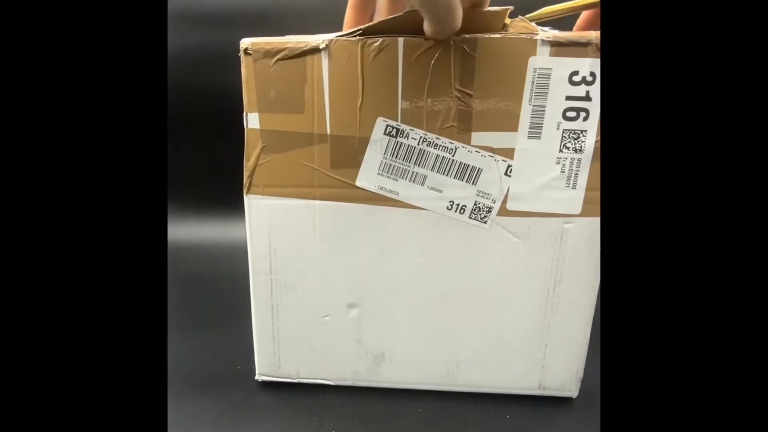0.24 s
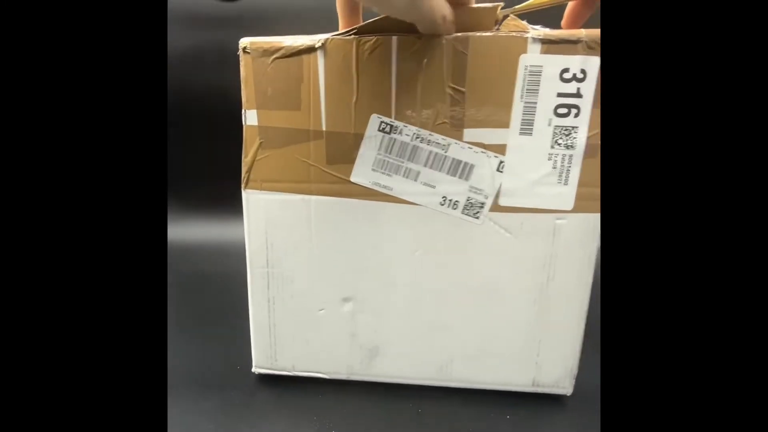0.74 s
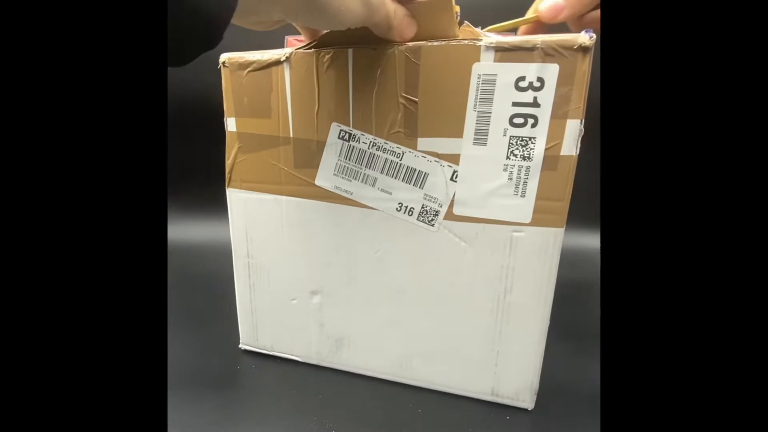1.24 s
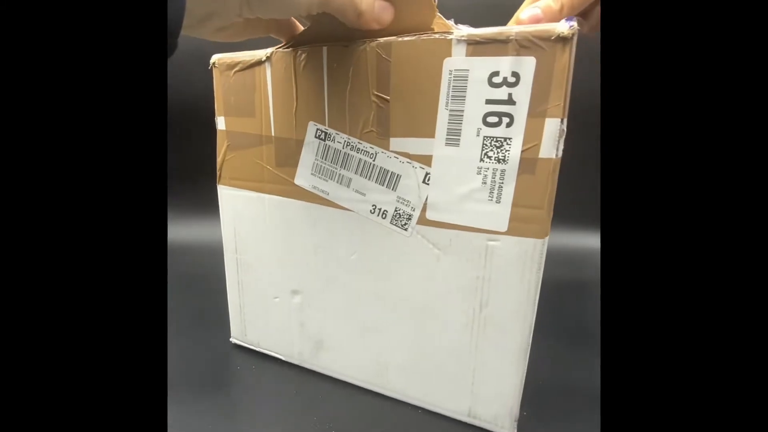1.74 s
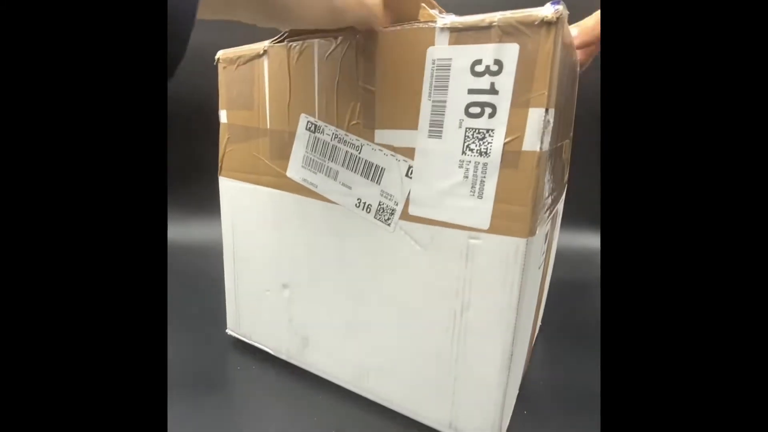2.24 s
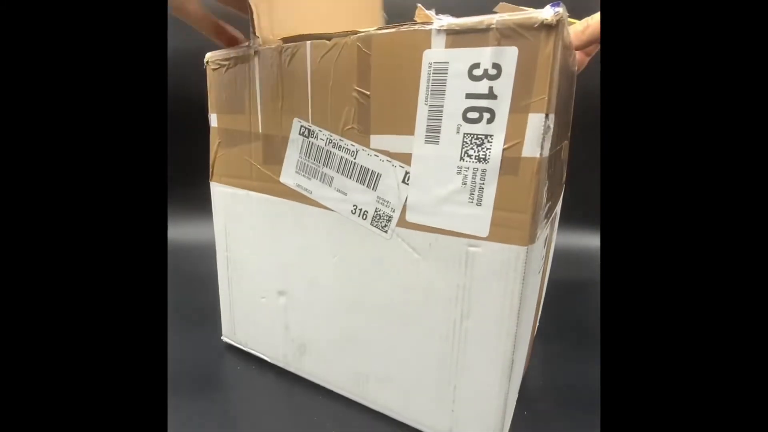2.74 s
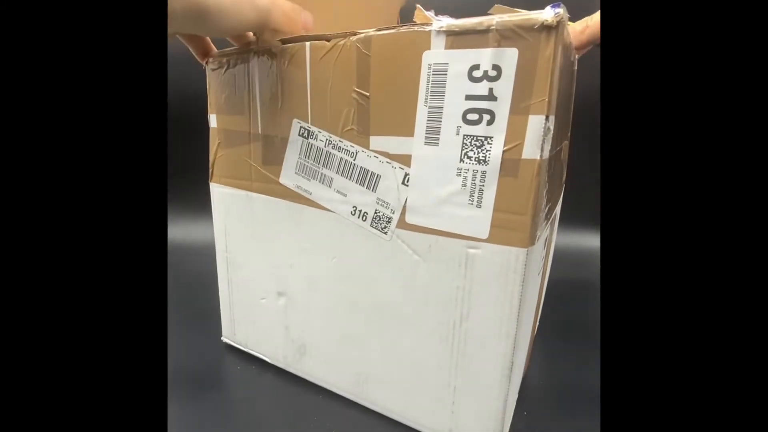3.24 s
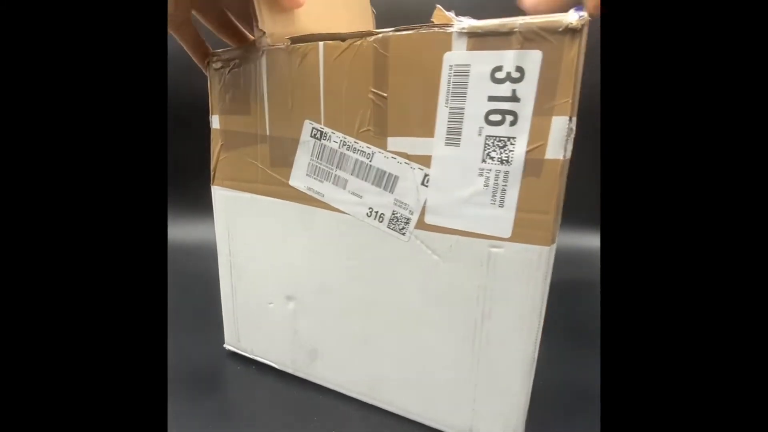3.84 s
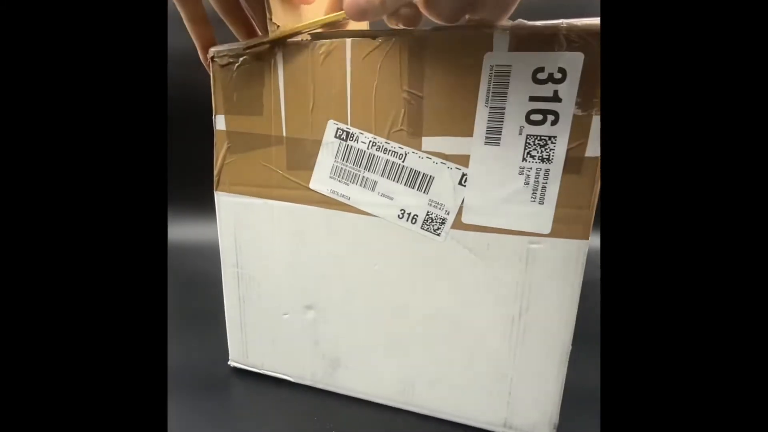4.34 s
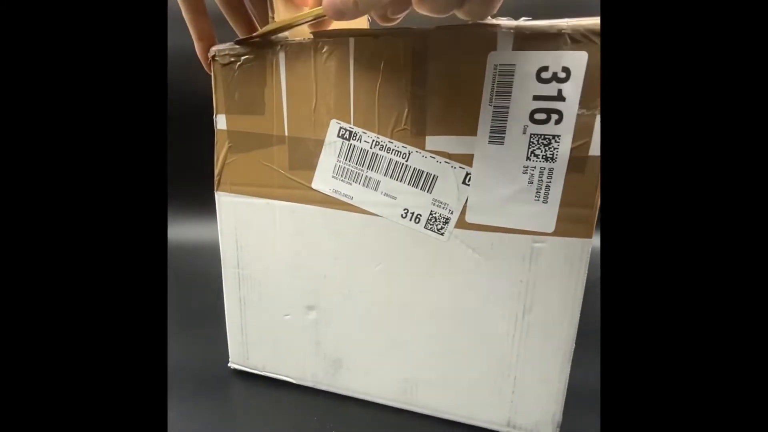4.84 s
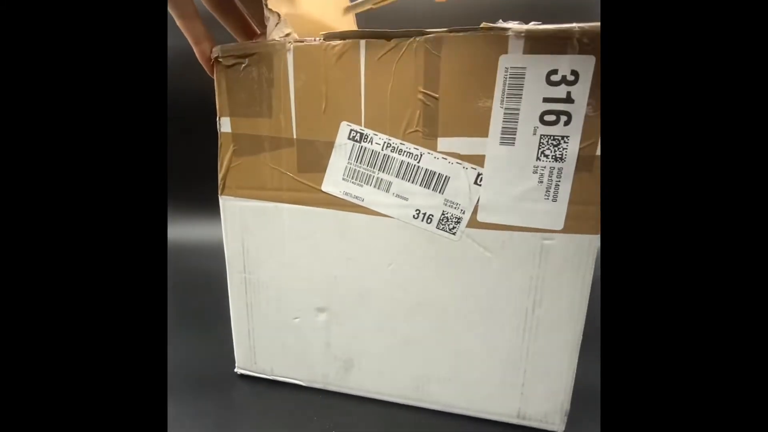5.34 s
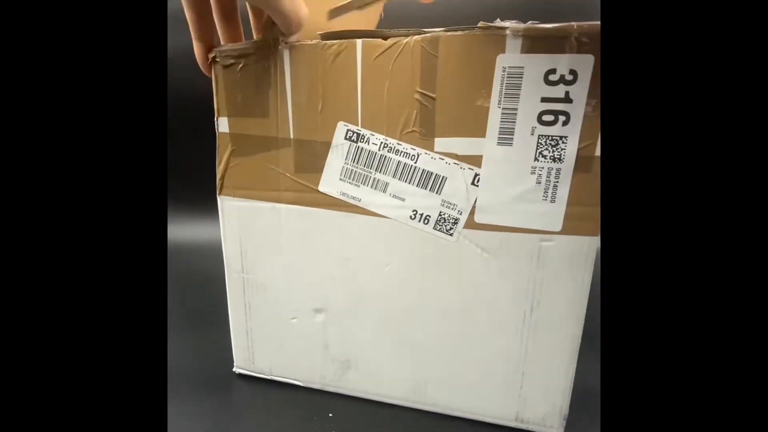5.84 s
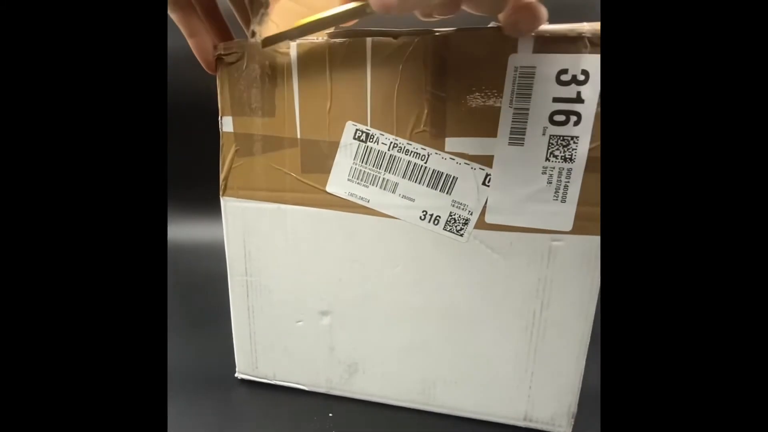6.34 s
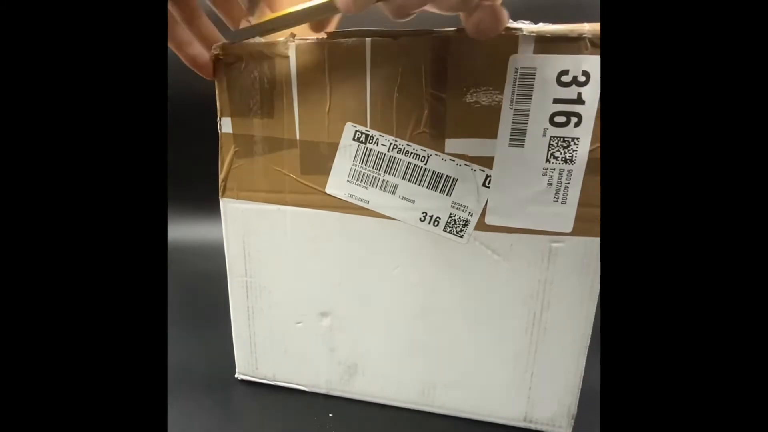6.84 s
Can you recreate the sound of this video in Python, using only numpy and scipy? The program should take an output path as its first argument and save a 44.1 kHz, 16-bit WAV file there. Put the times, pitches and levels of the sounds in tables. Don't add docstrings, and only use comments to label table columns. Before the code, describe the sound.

Close, dry handling of a taped carton: rustling and rubbing, sharp tape snaps, crackling tears and dull hollow knocks, with brief lulls.

```python
import sys
import numpy as np
from scipy import signal
from scipy.fft import rfft, irfft, next_fast_len
from scipy.io import wavfile

SR = 44100
rng = np.random.default_rng(int(sys.argv[2]) if len(sys.argv) > 2 else 0)


def undo_db(level):
    steps = np.asarray(level, float) / 20
    return 10 ** steps


def pcm_store(signal):
    levels = np.round(np.clip(np.atleast_2d(signal), -1, 1) * 32767)
    wavfile.write(sys.argv[1], SR, levels.astype(np.int16).T)


N = 312669
PADDED = next_fast_len(N + 8192)
HZ = np.maximum(np.arange(PADDED // 2 + 1) * SR / PADDED, 1)


def rms_one(x):
    return x / np.sqrt(np.mean(x ** 2) + 1e-20)


def in_time(rows):
    s, *columns = np.transpose(rows)
    return [np.interp(np.arange(N) / SR, s, column) for column in columns]


def at_hz(points):
    hz, values = np.array(points)[:, :2].T
    return np.interp(np.log(HZ), np.log(hz), values)


def colour(x, points, low_hz=1, high_hz=30000):
    edges = (1 + (low_hz / HZ) ** 6) * (1 + (HZ / high_hz) ** 6)
    gain = undo_db(at_hz(points)) / np.sqrt(edges)
    cepstrum = irfft(np.log(rms_one(gain) + 1e-5), PADDED)
    cepstrum[1:PADDED // 2] *= 2
    cepstrum[PADDED // 2 + 1:] = 0
    return irfft(rfft(x, PADDED) * np.exp(rfft(cepstrum)), PADDED)[..., :N]


def drift(rate):
    r = np.exp(-32 * np.pi * rate / SR)
    noise = rng.standard_normal(N // 16 + 2002)
    slow = signal.lfilter([1], [1, -2 * r, r * r], noise)[2000:]
    return np.interp(np.arange(N) / 16, np.arange(len(slow)), rms_one(slow))


def ring(x, hz, t60):
    r = undo_db(-60 / (t60 * SR))
    w = 2 * np.pi * hz / SR
    return signal.lfilter([0, np.sin(w)], [1, -2 * r * np.cos(w), r * r], x + 1e-18)


def fibres(spread_db, clump_db, clump_rate):
    uneven_db = spread_db * np.minimum(rng.exponential(1, N), 5)
    sizes = undo_db(uneven_db + clump_db * drift(clump_rate))
    return rng.standard_normal((2, N)) * rms_one(sizes)


# start_s, level_db
HUM_LEVEL = [
    (0.0, -49),
    (0.57, -67),
    (0.99, -50.5),
    (2.86, -43.5),
    (3.16, -51),
    (5.47, -56),
    (7.09, -57.5),
]
# pitch_hz, density_db
RUMBLE = [(20, -19), (45, -0.5), (62, 2), (80, 0.5), (100, -15), (160, -3.5)]
# pitch_hz, density_db
ROOM_TONE = [(100, 2.5), (260, 3.5), (400, -10.5), (900, -14), (1300, -23.5), (3000, -37), (6200, -33),
             (9000, -31), (16000, -55)]
ROOM_TONE_DB = -55
HUM_HZ, HUM_T60_S = 80, .45


def background():
    noise = rng.standard_normal(N)
    broad = 0.5 * colour(noise, RUMBLE, 0.64, 140)
    narrow = 0.47 * rms_one(ring(noise, HUM_HZ, HUM_T60_S))
    hum = (broad + narrow) * undo_db(in_time(HUM_LEVEL)[0])
    tone = colour(rng.standard_normal((2, N)), ROOM_TONE, 100)
    return hum * [[1], [0]] + undo_db(ROOM_TONE_DB - 5.5) * tone


# start_s, level_db
HUM_NOTE = [
    (0, -66),
    (.45, -61),
    (1.25, -60),
    (1.7, -52),
    (2.2, -75),
    (7.09, -80),
]


def hum_note():
    phase = 2 * np.pi * np.cumsum(HUM_HZ + .7 + 1.5 * drift(0.89)) / SR
    return np.sin(phase) * undo_db(in_time(HUM_NOTE)[0] + 7.0) * [[1], [0]]


# start_s, low_strip_db, high_strip_db
CREEP = [
    (0, -77, -80),
    (.2, -65, -64),
    (.45, -67, -63),
    (.56, -70, -70),
    (.62, -92, -93),
]
CREEP_HZ = [5130, 6600]


def creep():
    noise = rng.standard_normal((2, N))
    pulled = np.arange(N) < CREEP[-1][0] * SR
    strips = zip(in_time(CREEP), CREEP_HZ)
    return pulled * sum(undo_db(db) * rms_one(ring(noise, hz, 0.0099)) for db, hz in strips)


STROKE_CURVE = 1.55


def pressure(strokes):
    t = np.arange(N // 16 + 1) * 16 / SR
    out = 0
    for s, level_db, swell, fade in strokes:
        away = np.where(t < s, (s - t) / swell, (t - s) / fade)
        out = out + undo_db(level_db - 20 * away ** STROKE_CURVE)
    return np.repeat(out, 16)[:N]


# peak_s, level_db, swell_s, fade_s
RUBS = [(.045, -51.5, 0.059, 0.051), (.33, -60.5, 0.21, 0.26), (.539, -53.5, 0.069, 0.055),
        (.785, -41, 0.17, 0.1), (1.107, -51.5, 0.051, 0.063), (1.262, -47.5, 0.2, 0.052),
        (1.367, -45.5, 0.12, 0.3), (1.766, -35.5, 0.098, 0.066), (1.831, -40.5, 0.08, 0.063),
        (2.185, -45, 0.036, 0.11), (2.465, -45.5, 0.072, 0.16), (3.472, -42, 0.079, 0.033),
        (3.66, -57, 0.054, 0.19), (3.851, -47, 0.23, 0.13), (4.13, -60.5, 0.23, 0.27),
        (5.004, -31, 0.061, 0.076), (5.408, -48.5, 0.043, 0.052), (5.6, -51, 0.12, 0.088),
        (5.74, -59, 0.065, 0.76), (6.1, -45.5, 0.073, 0.045), (6.395, -60, 0.093, 0.067),
        (7.05, -49, 0.21, 0.041)]
# peak_s, level_db, swell_s, fade_s
SLIDES = [(.93, -55.5, 0.031, 0.2), (4.29, -58, 0.08, 0.24), (1.66, -39.5, 0.011, 0.15),
          (2.09, -50.5, 0.22, 0.047), (2.27, -46.5, 0.036, 0.038), (2.44, -52, 0.085, 0.071),
          (2.515, -35, 0.19, 0.0089), (2.58, -58.5, 0.063, 0.28), (2.878, -45.5, 0.2, 0.1),
          (3.008, -50.5, 0.042, 0.084), (3.293, -49, 0.053, 0.093), (3.367, -45, 0.021, 0.091),
          (3.55, -52, 0.15, 0.16), (4.207, -56.5, 0.0074, 0.11), (4.694, -55.5, 0.1, 0.15),
          (4.91, -49, 0.15, 0.091), (4.974, -39, 0.065, 0.047), (5.123, -34.5, 0.035, 0.031),
          (5.278, -44, 0.19, 0.061), (5.537, -36, 0.064, 0.023), (4.58, -68, 0.11, 0.04),
          (5.8, -53, 0.22, 0.67), (5.937, -51, 0.035, 0.088), (6.08, -32.5, 0.06, 0.028),
          (6.211, -36.5, 0.033, 0.037), (6.33, -41.5, 0.046, 0.22), (6.46, -38.5, 0.11, 0.13),
          (6.535, -45, 0.12, 0.031), (6.74, -54.5, 0.078, 0.28), (6.829, -44, 0.065, 0.15),
          (6.964, -43.5, 0.081, 0.093), (7.08, -43.5, 0.065, .1)]
# peak_s, level_db, half_length_s
SHOVES = [
    (.165, -41.5, 0.08),
    (0.593, -45.5, 0.1),
    (0.99, -47, 0.042),
    (2.093, -40.5, 0.15),
    (5.026, -37.5, 0.03),
    (6.149, -38.5, 0.06),
    (6.823, -37, 0.056),
]
# hiss_db, sheen_db, card_db, box_db
SLIDE_SHARE = (-3.5, 1.17, -14.5, -10.5)
RUB_SHARE = (-1.5, -2.5, -4.5, -1)
SHOVE_SHARE = (-26.5, -62, -19.5, -6)
REST_DB = -87
LIGHT_TOUCH_DULLS = 0.15


def rubbing():
    grains = fibres(spread_db=1.8, clump_db=1.3, clump_rate=160) * undo_db(1.2 * drift(22))
    shoves = [(s, db, half, half) for s, db, half in SHOVES]
    shares = undo_db(REST_DB) + np.outer(undo_db(SLIDE_SHARE), pressure(SLIDES))
    shares += np.outer(undo_db(RUB_SHARE), pressure(RUBS))
    shares += np.outer(undo_db(SHOVE_SHARE), pressure(shoves))
    shares[1] *= (shares[0] / undo_db(-40.5)) ** LIGHT_TOUCH_DULLS
    shares[-1] += grumble()
    return np.array([grains * share * undo_db(0.65 * drift(6.6)) for share in shares])


# start_s, peak_db, pitch_hz, t60_s
PLUCKS = [(0.5502, -40, 1220, 0.022), (.8585, -43, 3200, .04), (.32, -43, 3500, 0.09),
          (.922, -47, 6260, 0.046), (.970, -25.5, 7600, 0.091), (1.054, -41, 6200, 0.027),
          (1.101, -15, 6770, 0.1), (1.1515, -17, 3370, 0.032), (1.2052, -42, 6600, .03),
          (1.2636, -30, 5900, 0.077), (1.3454, -22.5, 2860, 0.076), (1.346, -25.5, 6310, 0.038),
          (1.417, -47, 6200, .03), (1.4387, -37, 2610, 0.071), (1.4757, -32, 2920, 0.037),
          (1.574, -39, 2960, 0.029), (1.6338, -17.5, 6330, 0.05), (1.711, -9.5, 2960, .04),
          (1.711, -16, 498, 0.025), (1.713, -16, 1497, 0.023), (1.7393, -23.5, 3650, 0.033),
          (2.4045, -4, 6200, 0.06), (2.405, -16, 1447, 0.069), (2.4336, -12, 3610, 0.03),
          (3.294, -30.5, 1870, 0.02), (3.294, -30, 4340, .03), (4.993, -22, 1270, 0.08),
          (3.354, -19, 6730, .04), (3.654, -50, 3900, 0.033), (3.734, -42.5, 3840, 0.068),
          (4.704, -6, 10660, 0.058), (4.705, -7.5, 6540, 0.035), (4.818, -46, 3100, .03),
          (4.992, -15, 878, 0.037), (4.992, -14, 1826, 0.038), (4.991, -14.5, 5180, 0.049),
          (5.038, -18.5, 5230, 0.11), (5.106, -19, 2400, 0.022), (5.5872, -24.5, 2000, 0.018),
          (5.687, -30.5, 3350, .03), (5.754, -32.5, 1800, 0.016), (5.922, -21.5, 1370, 0.033),
          (6.029, -5, 1252, 0.022), (6.030, -9, 870, 0.055), (6.5445, -30.5, 5830, 0.025),
          (6.8503, -27.5, 1920, .03), (6.981, -34, 1680, 0.028), (7.001, -26.5, 1390, 0.052),
          (7.0134, -25, 7750, .04), (7.0774, -5.5, 5400, 0.029), (7.079, -20.5, 1540, .04)]
# peak_s, peak_db, pitch_hz, half_length_s
RASPS = [(0.766, -33, 3010, 0.14), (0.777, -32.5, 6200, 0.053), (1.266, -36.5, 1700, 0.037),
         (1.546, -41.5, 1710, 0.043), (1.691, -27, 300, 0.017), (1.808, -28, 1770, 0.036),
         (1.849, -32, 2100, 0.029), (3.689, -46.5, 1456, 0.019), (3.849, -35.5, 1765, 0.1),
         (5.123, -30.5, 6020, .025), (6.223, -33.5, 1410, 0.012), (6.351, -36, 1350, 0.01),
         (6.411, -32.5, 1360, 0.058), (6.413, -27, 5960, 0.032), (6.574, -44, 1420, 0.0089),
         (6.635, -55.5, 5800, 0.073), (1.02, -53, 6100, 0.11), (6.963, -40, 1460, 0.043),
         (7.033, -31.5, 1450, 0.016), (6.308, -41.5, 1330, 0.013), (6.489, -38.5, 1360, 0.036),
         (5.943, -30, 6100, 0.046), (6.45, -46, 870, .04), (6.53, -49, 890, 0.028),
         (5.015, -39, 1300, 0.026), (6.44, -37, 426, 0.066)]
# start_s, peak_db, pitch_hz, t60_s
PANELS = [(1.712, -14, 760, .04), (2.435, -11.5, 500, 0.059), (4.269, -38, 755, 0.037),
          (4.993, -14, 436, 0.031), (5.69, -35, 654, 0.038), (.15, -39.5, 690, 0.26),
          (0.151, -41.5, 350, 0.39), (.52, -37, 372, 0.36), (1.712, -17, 272, .05),
          (4.708, -22, 2170, 0.16), (5.612, -33.5, 606, 0.16), (6.033, -10.5, 396, 0.038),
          (6.77, -45, 440, 0.18), (6.801, -34.5, 312, 0.16), (2.324, -28, 1080, 0.022),
          (2.529, -37, 195, 0.33)]
PLUCK_CYCLES, RASP_CYCLES, PANEL_CYCLES = 45, 21, 9.0
SPAN_APART_DB = -6.5
FREE_T60_S = .05
FIRST_GRAIN, FIRST_GRAIN_S = 1.4, .0012


def spans():
    out = np.zeros((2, N + SR))
    t = np.arange(SR // 5) / SR
    grains = fibres(spread_db=2.5, clump_db=3.0, clump_rate=490) * undo_db([[0], [SPAN_APART_DB]])
    first = FIRST_GRAIN * np.exp(-t / FIRST_GRAIN_S)
    shapes = []
    for s, db, hz, t60 in PLUCKS:
        cycles = PLUCK_CYCLES * np.clip(t60 / FREE_T60_S, .3, 1)
        shapes.append((s, db, hz, cycles, undo_db(-60 * t / max(t60, .01)) + first))
    for s, db, hz, half in RASPS:
        shapes.append((s - .1, db, hz, RASP_CYCLES, undo_db(-20 * ((t - .1) / half) ** 2)))
    for s, db, hz, t60 in PANELS:
        shapes.append((s, db, hz, PANEL_CYCLES, undo_db(-60 * t / max(t60, .01)) + first))
    for k, (s, db, hz, cycles, shape) in enumerate(shapes):
        at = round(s * SR)
        start = k * 4000 % (N - SR)
        rung = ring(grains[:, start:start + len(t)] * shape, hz, cycles / hz)
        out[:, at:at + len(t)] += undo_db(db) * rung / np.abs(rung[0]).max()
    return out[:, :N]


# start_s, level_db, sheen_above_db, t60_s
TAPE_SNAPS = [(.192, -41, 7, 0.095), (0.9683, -33, 12.5, 0.037), (1.477, -41, 4, 0.028),
              (1.6352, -32, -44, 0.045), (1.742, -29, -2.5, 0.16), (2.382, -41, -5, 0.025),
              (2.735, -31, -8, 0.014), (2.756, -37.5, 4.5, 0.093), (3.386, -53, 16, 0.033),
              (3.426, -32, 7, 0.041), (3.452, -27, 7, 0.026), (3.461, -23, 8.5, 0.037),
              (3.57, -44.5, 4, 0.094), (4.367, -50, 4.5, 0.079), (4.4657, -47.5, 4.5, 0.053),
              (4.687, -38, -0.5, 0.098), (4.7046, -14, 2.1, 0.12), (4.867, -33, 3, 0.032),
              (5.021, -38.5, 7, 0.44), (5.096, -53, -6, 0.26), (5.8763, -37.5, 6, 0.024),
              (6.1606, -45, 3, 0.21), (6.69, -42, -11, 0.036), (6.6948, -31.5, -24, .037),
              (6.945, -30, -21, 0.11), (6.981, -45.5, 20, .022)]
# start_s, level_db, card_above_db, t60_s
TEARS = [(1.0553, -37, -3, 0.04), (1.086, -27, -13.5, 0.17), (1.097, -24, -0.5, 0.046),
         (1.1498, -26.5, 2.5, 0.062), (1.244, -39.5, -18, 0.19), (1.341, -28.5, -1, 0.086),
         (1.7089, -20.5, 4.5, 0.13), (2.403, -13, -1, 0.11), (2.43, -21.5, -6, 0.041),
         (2.5002, -27.5, -0.5, 0.053), (2.7028, -44.5, 7.5, 0.21), (2.809, -29, 3.5, 0.061),
         (3.257, -43.5, 1.5, 0.12), (3.295, -39, 2.5, 0.054), (3.355, -31.5, 0, 0.077),
         (3.459, -24, -0.5, 0.053), (4.48, -46.5, 6, 0.18), (4.8165, -34.5, -2, 0.068),
         (4.946, -32.5, -2, 0.36), (4.987, -21, -18, 0.037), (4.9916, -18, -1, 0.081),
         (5.1065, -30.5, 1, 0.06), (5.492, -49, 2, 0.051), (5.713, -42.5, -3, 0.19),
         (5.961, -35.5, -0.5, 0.063), (6.441, -30, -1, 0.071), (6.765, -43.5, 4.5, 0.085),
         (7.0787, -16, -0.5, 0.034)]
# start_s, level_db, card_above_db, t60_s
CREASES = [(1.2045, -44, 10.5, 0.15), (2.3243, -51, 23.5, 0.079), (2.3425, -37, 11.5, 0.091),
           (2.4327, -26.5, 7.5, 0.042), (5.232, -34.5, 9.5, 0.016), (5.587, -39.5, -6, 0.056),
           (5.688, -41.5, 15, 0.064), (5.7522, -51, 10, 0.012), (5.9207, -24.5, 4, 0.034),
           (6.0283, -10, 5, 0.043), (6.338, -50, 2.5, 0.49), (6.85, -37, 3, 0.11), (6.9985, -33, 0, 0.075)]
# start_s, level_db
TICKS = [(0.269, -57), (0.45, -48), (0.6, -55), (0.527, -45), (.552, -53.5), (0.964, -33.5), (2.309, -54),
         (2.9, -47.5), (2.5834, -48.5), (2.622, -50), (4.1, -56.5), (3.414, -58.5), (4.446, -60),
         (5.3, -52), (3.654, -49), (4.559, -57.5), (4.651, -53), (5.5, -62.5), (6.576, -44), (5.8178, -53)]
CARD_UNDER_TAPE_DB, TEAR_SHEEN_DB, CREASE_SHEEN_DB = -30, -2, 0
TICK_SHEEN_DB, TICK_CARD_DB, TICK_T60_S = 2, -2.5, 0.053


def breaks():
    snapped = [(s, db, db + sheen, db + CARD_UNDER_TAPE_DB, t60) for s, db, sheen, t60 in TAPE_SNAPS]
    torn = [(s, db, db + TEAR_SHEEN_DB, db + card, t60) for s, db, card, t60 in TEARS]
    creased = [(s, db, db + CREASE_SHEEN_DB, db + card, t60) for s, db, card, t60 in CREASES]
    ticked = [(s, db, db + TICK_SHEEN_DB, db + TICK_CARD_DB, TICK_T60_S) for s, db in TICKS]
    return snapped + torn + creased + ticked


# start_s, hiss_db, sheen_db
CRACKS = [(3.2945, -22, -18), (3.3547, -24, -11), (3.428, -29, -29), (3.461, -15.5, -2.5),
          (4.705, -14, -1.5), (5.5873, -19, -24), (5.689, -34, -29), (5.921, -22, -12.5), (6.029, -15, -20),
          (6.5448, -30, -18), (6.981, -28, -22), (6.8503, -29, -32), (6.9456, -28, -34), (7.079, -18, -4.5),
          (1.575, -36.5, -31)]


def snaps():
    showers = np.zeros((4, N))
    t = np.arange(SR // 4) / SR
    for s, hiss_db, sheen_db, card_db, t60 in breaks():
        at = round(s * SR)
        tail = undo_db(-60 * t / max(t60, .01))
        crack = (tail + .8 * np.exp(-t / .0012)) * (1 - np.exp(-t / .0004))
        answer = tail * (1 - np.exp(-t / 0.0013))
        levels = undo_db([[hiss_db - 0.5], [sheen_db + 0.5], [card_db - 9.0]])
        showers[:3, at:at + len(t)] += (levels * [crack, crack, answer])[:, :N - at]
    out = showers[:, None] * fibres(spread_db=2.5, clump_db=2.0, clump_rate=290)
    for s, hiss_db, sheen_db in CRACKS:
        out[:2, 0, round(s * SR)] += undo_db([hiss_db - 3, sheen_db + 8.5])
    return out


# start_s, level_db, pitch_hz, t60_s
KNOCKS = [(1.103, -30.5, 217, 0.084), (1.158, -29, 200, 0.078), (1.346, -33, 224, 0.05),
          (1.7142, -10.5, 149, 0.062), (1.76, -33, 144, 0.18), (1.826, -43.5, 173.2, 0.28),
          (1.889, -43.5, 153.5, 0.25), (2.1737, -32.5, 103.8, 0.018), (2.3293, -31.5, 247, 0.033),
          (2.352, -29, 72, 0.1), (2.408, -22.5, 176, 0.074), (2.435, -24, 141.6, 0.075),
          (2.505, -43, 202.4, 0.38), (2.7602, -38, 94.4, 0.086), (2.8192, -29, 110, 0.088),
          (3.4643, -44.5, 265, 0.17), (3.735, -41.5, 152.5, 0.091), (4.271, -33.5, 100, 0.045),
          (6.094, -41.5, 99, 0.32), (4.9925, -27.5, 250, 0.18), (5.115, -40, 429, 0.1),
          (5.552, -36.5, 83.0, 0.088), (5.609, -35.5, 134, 0.074), (5.6906, -39, 251, 0.055),
          (5.9245, -34, 382, 0.045), (6.031, -17, 109, 0.075), (6.2038, -43.5, 387, 0.11),
          (6.5015, -54, 255, 0.078), (6.8387, -34, 84, 0.09), (7.0263, -39, 172, 0.15)]
# pitch_hz, level_db, t60_s
BOX = [(93, -4, 0.079), (172, -6.5, 0.048), (210, -14, 0.084), (265.7, -1.5, 0.051), (350.6, -0.5, 0.037),
       (441, -34, 0.012), (519, -6.5, 0.039), (566, -24.5, 0.11)]
LAG_CYCLES = 0.55
SAG, SAG_S, MODE_LAG_CYCLES = 0.88, 0.0041, .8


def knocks():
    out = np.zeros(N)
    t = np.arange(SR // 4) / SR
    luck = rng.normal(0, 1, (len(KNOCKS), len(BOX)))
    contact = rng.standard_normal(N + len(t))
    for (s, level_db, panel_hz, t60), strengths in zip(KNOCKS, luck):
        at = round((s - .003) * SR)
        late = np.maximum(t - LAG_CYCLES / panel_hz, 0)
        turns = panel_hz * (late + SAG * SAG_S * (1 - np.exp(-late / SAG_S)))
        swell_and_fade = undo_db(-60 * late / max(t60, .02)) * (1 - np.exp(-late / .003))
        swing = np.sin(2 * np.pi * turns) * swell_and_fade
        rough = contact[at:at + len(t)] * np.exp(-t / 0.002) * 0.074
        shake = 0
        for (hz, db, mode_t60), strength in zip(BOX, strengths):
            rung = ring(rough, hz, mode_t60)
            delayed = np.interp(t - MODE_LAG_CYCLES / hz, t, rung, left=0)
            shake = shake + undo_db(db + 4.1 * strength) * delayed
        out[at:at + len(t)] += undo_db(level_db + 9.0) * (swing + 0.91 * shake)[:N - at]
    return out


RUMBLE_ON_DB, RUMBLE_ON_T60_S = -9.5, 0.18


def grumble():
    kicks = np.zeros(N)
    kicks[[round(k[0] * SR) for k in KNOCKS]] = undo_db([k[1] + RUMBLE_ON_DB for k in KNOCKS])
    return signal.lfilter([1], [1, -undo_db(-60 / (RUMBLE_ON_T60_S * SR))], kicks)


def sympathy(x, modes, wander_db, wander_rate):
    out = 0
    for hz, db, t60 in modes:
        unit = np.sqrt(4 * np.log(1000) / (t60 * SR))
        driven = x * undo_db(wander_db * drift(wander_rate))
        out = out + unit * undo_db(db) * ring(driven, hz, t60)
    return out


def patches(x, patch_db, rate):
    spectrum = rfft(x, PADDED)
    place = np.clip(2 * np.log2(HZ / 500), 0, 10)
    out = 0
    for band in range(11):
        share = np.maximum(1 - np.abs(place - band), 0)
        out = out + irfft(spectrum * share, PADDED)[:, :N] * undo_db(patch_db * drift(rate))
    return out


# pitch_hz, density_db
TAPE = [(1000, -26.5), (1500, -2.5), (2200, -6.5), (3100, 0.5), (4500, -7.5), (6100, -0.5), (7100, -4.5),
        (9000, -5.5), (10600, -7), (12000, -10), (14000, -14.5), (16500, -5)]
CARD = [(240, -41.5), (400, 7.5), (511, 4.5), (560, 1.5), (647, 4.5), (728, -3), (854, -1.5), (978, -13),
        (1320, -5.5), (1500, -13.5), (1840, -10.5), (2110, -9.5), (3000, -10.5), (3900, -38.5),
        (6600, -120)]
# pitch_hz, level_db, t60_s
STRIPS = [(3260, -17, 0.004), (5470, -22, 0.0081), (6200, -17.5, 0.0019)]
FLAPS = [(878, -30.5, 0.058), (1010, -35.5, 0.035), (1396, -8.5, 0.011), (1680, -30, 0.078),
         (2100, -21.5, 0.013)]
# start_s, pitch_hz, level_db, t60_s
FREED_FLAP = (5.9, 1340, -6, .022)


def package(hiss, sheen, card, box):
    tape = 0.96 * colour(hiss, TAPE, 2016, 7950) + colour(sheen, TAPE, 5180)
    tape += sympathy(hiss, STRIPS, wander_db=7.5, wander_rate=11.0)
    flaps = 0.93 * colour(card, CARD, 592, 3000)
    flaps += sympathy(card, FLAPS, wander_db=1.0, wander_rate=8.7)
    freed = np.arange(N) > FREED_FLAP[0] * SR
    flaps += sympathy(card * freed, [FREED_FLAP[1:]], wander_db=-3.0, wander_rate=7)
    hollow = 0.44 * sympathy(box, BOX, wander_db=0.5, wander_rate=7.0)
    return patches(tape + flaps, patch_db=2.32, rate=10.7) + hollow


ROOM_T60_S, ROOM_DB = .12, -18


def room(x):
    t = np.arange(SR // 3) / SR
    tail = rng.standard_normal((2, len(t))) * undo_db(-60 * t / ROOM_T60_S) * (t > .004)
    tail = signal.sosfilt(signal.butter(1, [150, 7000], "band", fs=SR, output="sos"), tail)
    tail /= np.sqrt(np.sum(tail ** 2, axis=1, keepdims=True))
    return undo_db(ROOM_DB) * signal.fftconvolve(x, tail, axes=1)[:, :N]


def scene():
    box = package(*(rubbing() + snaps())) + knocks() * [[1], [0]] + creep()
    return box + room(box) + background() + spans() + hum_note()


def low_pass(x):
    return signal.sosfilt(signal.butter(12, 16810, fs=SR, output="sos"), x)


# pitch_hz, left_lead_rad
PORT_PHASE = [(0, 0), (350, .4), (700, 2.4), (1200, .6), (1750, -.2), (2400, -2.6), (3100, -4.2),
              (3800, -6.1), (5200, -7.6), (6500, -7.5), (7300, -9.6), (8000, -12.4), (9500, -12.6)]
# pitch_hz, left_over_right_db
PORT_BALANCE = [(60, .2), (150, 0), (350, 2), (700, 5), (1400, 2.5), (2800, 1.5), (5500, -3), (9000, -.5),
                (14000, -.3)]
# pitch_hz, likeness (0 to 1)
LIKENESS = [(100, 1), (300, 0.94), (700, 0.98), (1300, 0.33), (2500, 0.24), (5000, 0.2), (7300, 0.17),
            (9000, 0.51), (10500, 0.91), (15000, 0.87)]
MIC_CUT_HZ, TOP_HZ = 65.4, 15900


def record(dry):
    bass_cut = signal.butter(3, MIC_CUT_HZ, "high", fs=SR, output="sos")
    first, second = rfft(signal.sosfilt(bass_cut, dry), PADDED)
    alike = np.clip(at_hz(LIKENESS), 0, 1)
    shared = np.sqrt((1 + alike) / 2) * first
    apart = np.sqrt((1 - alike) / 2) * second
    lead = np.interp(HZ, *np.transpose(PORT_PHASE))
    skew = undo_db(at_hz(PORT_BALANCE) / 2) * np.exp(.5j * lead)
    ports = irfft([(shared + apart) * skew, (shared - apart) / skew], PADDED)[:, :N]
    ports = signal.sosfilt(signal.cheby2(14, 45, TOP_HZ, fs=SR, output="sos"), ports)
    mix = .92 * np.tanh(ports / .92)
    return low_pass(mix)


dry = scene()
out = record(dry)
pcm_store(out)
```